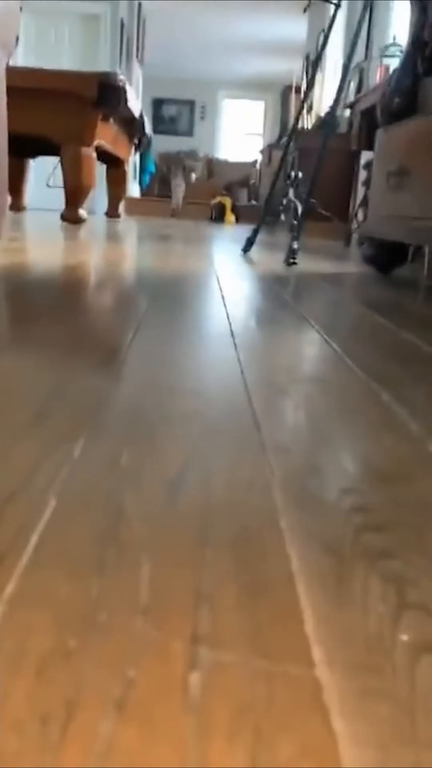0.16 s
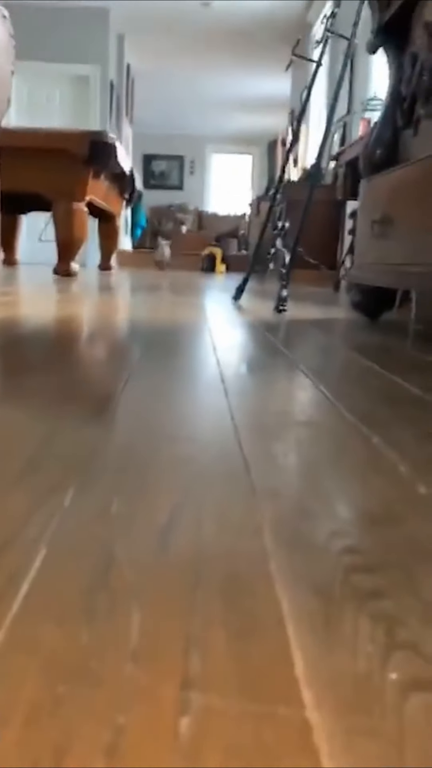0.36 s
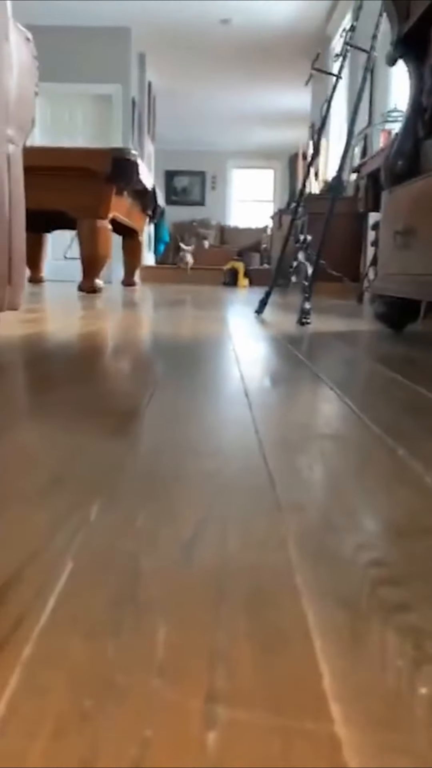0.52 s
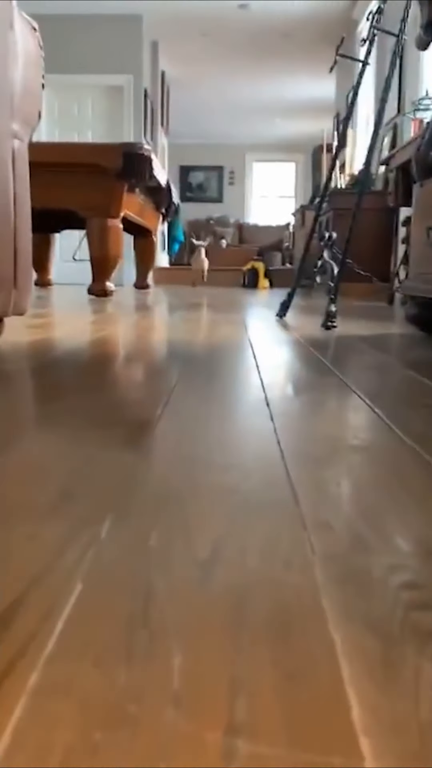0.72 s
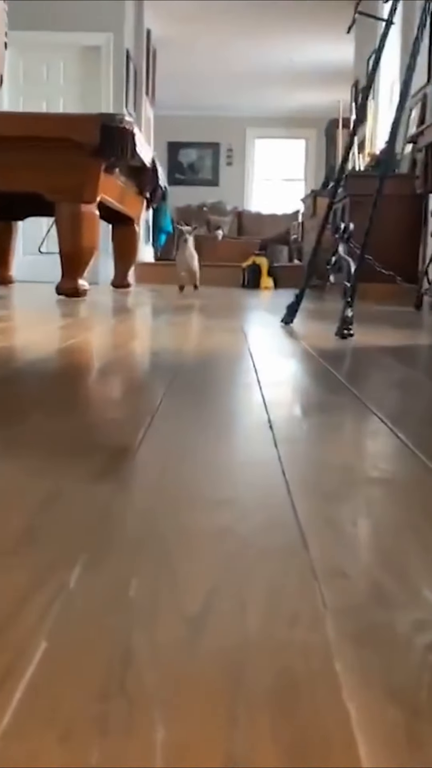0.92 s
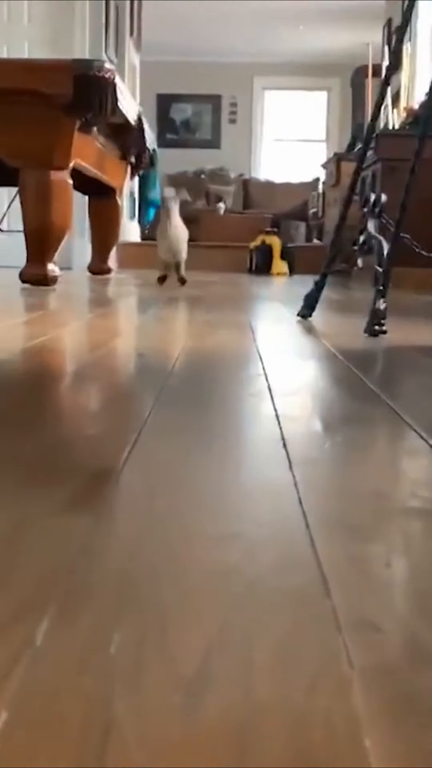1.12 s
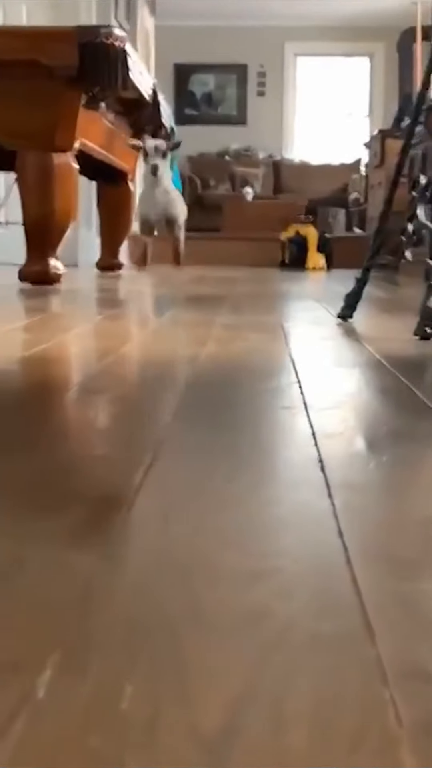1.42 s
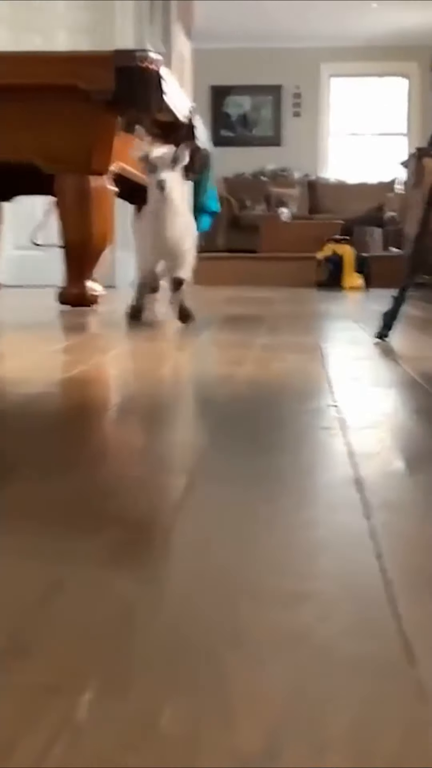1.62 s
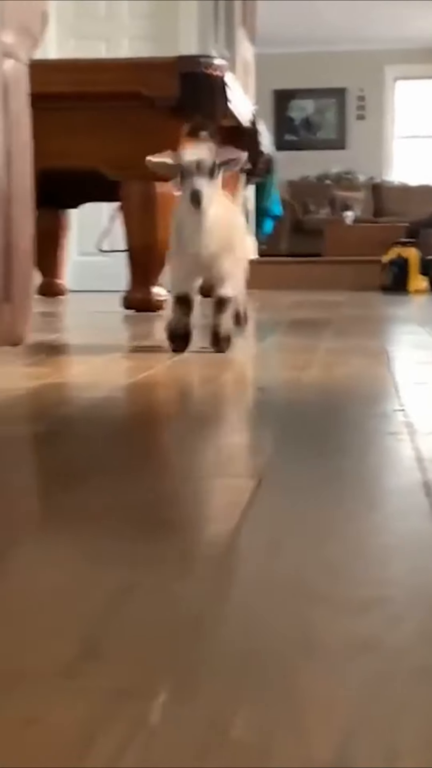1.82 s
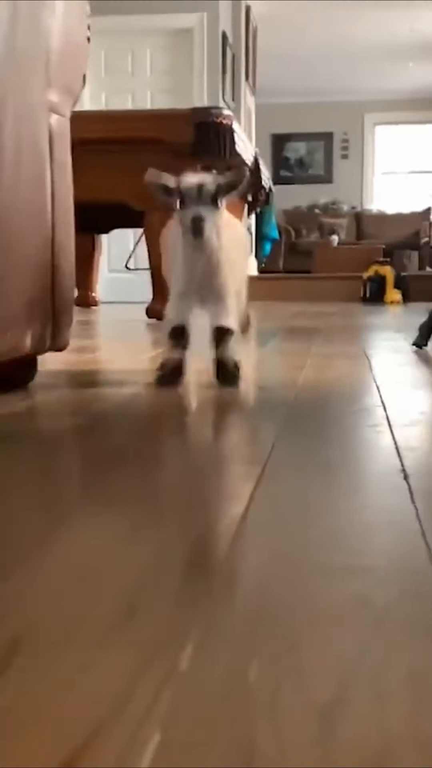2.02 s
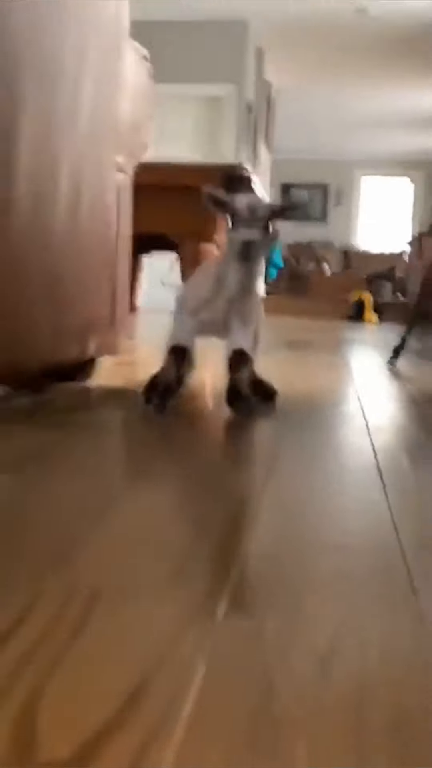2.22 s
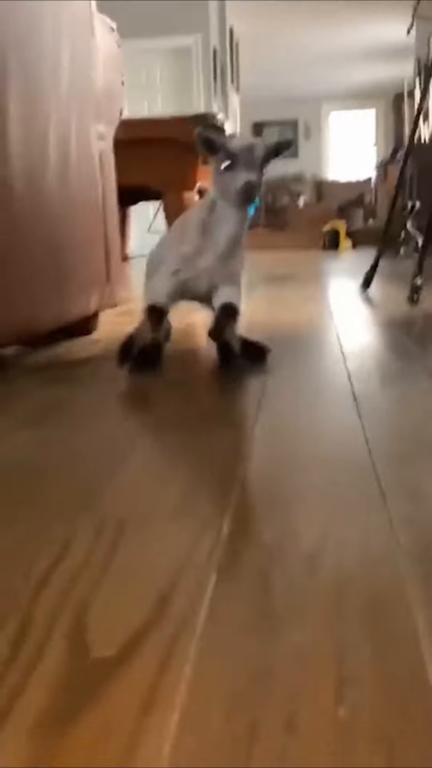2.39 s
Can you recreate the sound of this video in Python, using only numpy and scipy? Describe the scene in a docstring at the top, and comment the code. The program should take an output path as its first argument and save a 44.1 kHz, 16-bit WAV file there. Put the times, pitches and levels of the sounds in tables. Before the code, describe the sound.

A baby goat's hooves clatter over a hardwood floor, bounding closer and skidding to a stop.

```python
"""A big bare room with a hardwood floor, heard from one microphone held low, over a faint rumble.
First come distant hoof taps, and something snaps sharply right at the microphone. Then a kid goat bounds
towards it, each bound a cluster of hoof strikes: a clack, ringing boards, a boom of the joists, an echo.
On the way hooves scrape, the hardest landings crack, and flat ones trap air and clop.
At last the goat skids to a stop close by, as a faint hiss swells."""
import sys
import numpy as np
from scipy import signal
from scipy.fft import irfft
from scipy.io import wavfile

SR = 44100
rng = np.random.default_rng(int(sys.argv[2]) if len(sys.argv) > 2 else 0)


def transcribe(u):
    """Save the signal u as a 16-bit wav file named by the first command-line argument.

    u: samples, shape (n,) or (channels, n), limited to [-1, 1]; the rate is SR.
    q: integer samples, one column per channel.
    """
    v = np.clip(np.atleast_2d(u).T, -1, 1)
    q = np.round(v * 32767).astype(np.int16)
    wavfile.write(sys.argv[1], SR, q)


N = 112454


def amp(db):
    """Decibels to gain."""
    return 10 ** (np.asarray(db) / 20)


def unit_rms(x):
    """Scales to rms 1."""
    return x / np.sqrt(np.mean(x ** 2) + 1e-20)


def spectrum_db(points, hz):
    """Reads a spectrum on a log-frequency axis."""
    point_hz, point_db = np.transpose(points)
    return np.interp(np.log(hz + 1), np.log(point_hz + 1), point_db)


def add(mix, start_s, sound):
    """Mixes a sound in, dropping whatever falls outside the mix."""
    at = round(start_s * SR)
    part, sound = mix[max(at, 0):], sound[max(-at, 0):]
    part[:len(sound)] += sound[:len(part)]


def noise(shape, size):
    """Noise of rms 1 with the given relative gain per frequency bin."""
    return unit_rms(irfft(shape * np.exp(2j * np.pi * rng.random(len(shape))), size))


def coloured(points, size):
    """Noise of rms 1 that follows a spectrum."""
    return noise(amp(spectrum_db(points, np.fft.rfftfreq(size, 1 / SR))), size)


def decay(t, t60):
    """Falls by 60 dB in t60 seconds."""
    return np.exp(-np.log(1000) * t / t60)


# The room's steady rumble. Each row: frequency in Hz, relative level in dB.
RUMBLE_COLOUR = [(20, 15), (35, 10), (66, 6), (120, -10), (300, -12), (700, -12.5), (1500, -17.5),
                 (3000, -21.5), (6500, -27), (10000, -53), (13000, -52)]
# The hiss above it. Each row: frequency in Hz, relative level in dB.
HISS_COLOUR = [(500, 12.5), (3000, -2), (6500, 1), (8000, -0.5), (10000, -8.5), (13000, -10)]
# The course of that hiss. Each row: time in seconds, level in dB.
HISS_LEVELS = [(0, -57.5), (1.901, -76.5), (2.2, -43), (2.36, -50), (2.55, -53.5)]

def room_tone(rumble_db=-44):
    """All around the microphone: low rumble, and a faint hiss that fades, then swells as the goat stops."""
    hiss_db = np.interp(np.arange(N) / SR, *np.transpose(HISS_LEVELS))
    return amp(rumble_db) * coloured(RUMBLE_COLOUR, N) + amp(hiss_db) * coloured(HISS_COLOUR, N)


# Hoof on hardwood. Each row: frequency in Hz, relative level in dB.
WOOD_COLOUR = [(40, -2), (66, -1.5), (120, -5.5), (300, 5.5), (600, -5), (900, -5.5), (1250, -7.5),
               (1600, -5.5), (2100, -5), (2750, -5.5), (3300, -11.5), (4300, -11.5), (5300, -12),
               (6400, -11.5), (8000, -17.5), (10000, -27), (13000, -21.5)]
# Resonances of the floorboards. Each row: frequency in Hz, width in Hz, lift in dB.
BOARD_RESONANCES = [(74.5, 62, 6.5), (203.3, 5.8, 6.5), (360, 10.6, -1), (455.6, 5.6, 6.5), (538, 25, 4),
                    (929, 44, 2.5), (1190, 37, 5.5)]
# A strike's boom, thud, knock, clack and tick. Each row: low and high edge in Hz, direct attack and t60
# in seconds, direct gain in dB, room build-up and t60 in seconds.
REGISTERS = [(48, 130, 0.026, 0.19, -1, 0.014, 0.49), (153, 755, 0.0031, 0.13, -3, 0.014, 0.58),
             (565, 1290, 0.0018, 0.048, 1.5, 0.014, 0.61), (1280, 4210, 0.0042, 0.077, 0, 0.0078, 0.66),
             (4100, 9800, 0.00057, 0.028, 3, 0.0077, 0.55)]
# Hoof strikes on the way to the microphone. Each row: start in seconds, boom, thud, knock, clack and
# tick in dB, direct sound over the room in dB, the board's note in Hz, its level in dB.
STRIKES = np.array([ (-.04, -47, -43, -37, -38.5, -54, 24.5, 415, -39),
           (.030, -36, -53, -52.5, -63, -62, 12.5, 152.5, -36),
           (.319, -28.5, -38, -29, -37.5, -50, 3, 856, -30), (.334, -41, -31, -38, -38, -54, 10, 786, -20),
           (.345, -32, -28.5, -28.5, -62, -43.5, -11, 223, -20.5),
           (.382, -31, -55, -55, -34.5, -48, -13, 223, -21.5),
           (.405, -30.5, -28, -34, -48, -45, -4, 336, -40),
           (.519, -26.5, -34.5, -35, -33, -47.5, 3, 533, -40),
           (.572, -26.5, -36.5, -36.5, -42, -50, 4.5, 280, -43),
           (.765, -39, -36.5, -31, -36, -52, 3, 950, -23),
           (.803, -25.5, -32.5, -33, -34, -51.5, -8, 917, -21.5),
           (.968, -27, -46, -31.5, -45, -44, -12, 1182, -21),
           (.974, -24.5, -32.5, -35, -31, -47.5, 1.5, 456, -20.5),
           (1.014, -28.5, -31, -47, -32, -54, 4, 293, -40),
           (1.200, -38, -27, -27.5, -38, -39.5, 8, 454, -14),
           (1.208, -31, -28.5, -32.5, -34, -57, 10.5, 1185, -18.5),
           (1.237, -23.5, -25.5, -31, -37, -49, 10, 470, -35),
           (1.256, -50, -45, -28.5, -33.5, -46.5, 4.5, 1315, -22.5),
           (1.433, -26.5, -26.5, -29.5, -34, -42.5, 7.5, 224, -22),
           (1.445, -21, -30.5, -39, -35, -50.5, 9, 437, -30.5),
           (1.475, -24.5, -25.5, -29, -38.5, -50, 7.5, 194, -18.5),
           (1.508, -39, -27.5, -30, -39, -68, -2, 313, -28),
           (1.666, -42, -34, -24.5, -53, -50, 4, 190.5, -19),
           (1.675, -23, -32, -64, -33, -37, 4, 457, -19.5),
           (1.710, -39, -24.5, -32, -37.5, -46, 9, 289, -19.5),
           (1.735, -50, -32, -27.5, -36.5, -56, 6, 392, -15),
           (1.775, -50, -35.5, -33, -57, -69, 10, 931, -29),
           (1.904, -55.5, -25.5, -29, -33, -43, 7.5, 950, -21),
           (1.913, -31, -22, -29.5, -45, -50, 8.5, 545.6, -12),
           (1.920, -52, -31, -42, -54, -56, 8.5, 391.3, -11.5),
           (1.956, -34.5, -33, -35, -36.5, -51, 6.5, 271, -23),
           (2.118, -30.5, -34, -35, -37.5, -58, 15, 828, -20),
           (2.135, -35.5, -26.5, -34, -44.5, -60, 14, 660, -20),
           (2.179, -64, -36.5, -54, -38.5, -57, 15, 537, -21.5),
           (2.202, -36, -42, -39, -56, -72, 10.5, 338, -28), (2.243, -44, -43, -62, -52, -66, 6, 379, -40),
           (2.468, -50, -42, -49, -61, -61, 8, 630, -36)])

def hooves():
    """Each strike rings the floor in five registers; direct sound comes quickly, the room more slowly."""
    out, t = np.zeros(N), np.arange(SR) / SR
    hz = np.fft.rfftfreq(SR, 1 / SR) + 1
    lift_db = sum(db / (1 + (2 * (hz - centre) / width) ** 2) for centre, width, db in BOARD_RESONANCES)
    wood = amp(spectrum_db(WOOD_COLOUR, hz) + lift_db)
    bands = [wood / np.sqrt((1 + (low / hz) ** 8) * (1 + (hz / high) ** 10))
             for low, high, *_ in REGISTERS]
    for start, *levels_db, near_db, _, _ in STRIKES:
        for band, level_db, register in zip(bands, levels_db, REGISTERS):
            attack_s, direct_t60, direct_db, build_s, room_t60 = register[2:]
            direct = noise(band, SR) * (1 - np.exp(-(t / attack_s) ** 2)) * decay(t, direct_t60)
            room = noise(band, SR) * (1 - np.exp(-t / build_s)) * decay(t, room_t60)
            add(out, start, amp(level_db) * (amp(near_db + direct_db) * direct + room))
    return out


def board_notes(rise_cycles=0.91, t60_cycles=41.2, echo_db=-16.5, echo_t60=0.73):
    """Under each of those strikes a board sounds its own hollow note, which lingers in the room."""
    out, t = np.zeros(N), np.arange(SR) / SR
    hz = np.fft.rfftfreq(SR, 1 / SR)
    for start, *_, note_hz, note_db in STRIKES:
        ring = np.sin(2 * np.pi * note_hz * t) * decay(t, t60_cycles / note_hz)
        echo_band = 1 / (1 + (2 * (hz / note_hz - 1) / 0.046) ** 2)  # width: 4.6 % of the pitch
        echo = noise(echo_band, SR) * decay(t, echo_t60)
        rise = 1 - np.exp(-t * note_hz / rise_cycles)
        add(out, start, amp(note_db) * rise * (ring + amp(echo_db) * echo))
    return out


# What the snap rings with, heard close up. Each row: frequency in Hz, level in dB, t60 in seconds.
SNAP_MODES = [(48, -15.5, 0.14), (1350, -14, 0.0007), (1960, 0, 0.0039), (2380, -0.5, 0.0046),
              (3900, -13, 0.0088), (6280, -7, 0.0051), (2320, -35, 0.11)]
# Its thin rattle. Each row: frequency in Hz, relative level in dB.
RATTLE_COLOUR = [(200, 7), (1300, -36), (2400, 4), (3200, -8), (4000, 1), (5100, -14), (6600, 8),
                 (8300, -5), (10000, -22), (13000, -21)]
# Its echo from the room. Each row: frequency in Hz, relative level in dB.
SNAP_ECHO_COLOUR = [(200, -25), (600, -37), (1300, 4), (1800, 0), (2500, -8), (3800, 3), (5000, -1.5),
                    (6500, 1.5), (8300, -2), (10000, -10.5), (13000, -13)]

def snap(start_s=0.1061, tick_s=0.07, rise_cycles=0.95, chirp_hz=1550, chirp_fall_s=0.0016):
    """A hard click at the microphone: quick modes, a low bump, a falling chirp, a rattle, a faint echo."""
    out, t = np.zeros(N), np.arange(SR) / SR
    ring = sum(amp(db) * np.sin(2 * np.pi * hz * t) * (1 - np.exp(-t * hz / rise_cycles)) * decay(t, t60)
               for hz, db, t60 in SNAP_MODES)
    cycles = np.cumsum(chirp_hz / (1 + (t / chirp_fall_s) ** 2)) / SR  # the low tones arrive late
    chirp = amp(-18.5) * np.sin(2 * np.pi * cycles) * np.minimum(cycles, 1) * decay(t, t60=0.044)
    rattle = amp(-27.5) * coloured(RATTLE_COLOUR, SR) * decay(t, t60=0.15)
    echo = amp(-36) * coloured(SNAP_ECHO_COLOUR, SR) * decay(t, t60=0.46)
    add(out, tick_s, amp(-30) * (ring + rattle))  # the same thing ticks faintly before it snaps
    add(out, start_s, ring + chirp + rattle + echo)
    return out


# Horn scraping on varnish. Each row: frequency in Hz, relative level in dB.
SKID_COLOUR = [(300, -18), (1500, 3), (2700, 5.5), (3500, 3), (4400, -1), (5400, -5.5), (6500, 0.5),
               (8200, -10.5), (10000, -16.5), (13000, -21)]
# Hooves that slide as they land. Each row: start in seconds, length in seconds, level in dB.
SKIDS = [(0.526, 0.048, -43), (1.663, 0.023, -29), (1.899, 0.03, -31.5), (2.117, 0.022, -37)]

def skids(grit_db=4, grain_s=0.00058):
    """Horn scrapes over the varnished floor in short gritty bursts."""
    out, t = np.zeros(N), np.arange(SR) / SR
    for start, length, db in SKIDS:
        roughness = np.interp(t / grain_s, np.arange(SR), rng.standard_normal(SR))
        grit = unit_rms(amp(grit_db * roughness))
        stroke = np.sqrt(abs(np.sin(np.pi * np.minimum(t / length, 1))))
        add(out, start, amp(db) * stroke * grit * coloured(SKID_COLOUR, SR))
    return out


# Modes of hoof horn on wood. Each row: multiple of the pitch, level in dB, t60 in seconds.
HORN_MODES = [(0.57, -27, 0.011), (0.8, -25, 0.031), (1, 3, 0.016), (1.265, -4, 0.026),
              (2.04, -21.5, 0.048)]
# The hardest landings. Each row: start in seconds, level in dB, pitch of the horn in Hz.
CRACKS = [(0.9753, -17, 2113), (1.2068, -11, 2186), (1.255, -19, 2110), (1.675, -24.5, 4350),
          (1.9122, -23, 2830), (2.1189, -21, 2190), (2.186, -20.5, 1875)]

def cracks(rise_s=0.00067):
    """A hard landing makes the horn itself ring for a moment, higher when only its edge strikes."""
    out, t = np.zeros(N), np.arange(SR // 4) / SR
    for start, level_db, hz in CRACKS:
        phases = 2 * np.pi * rng.random(len(HORN_MODES))
        ring = sum(amp(db) * np.sin(2 * np.pi * hz * ratio * t + phase) * decay(t, t60)
                   for (ratio, db, t60), phase in zip(HORN_MODES, phases))
        add(out, start, amp(level_db) * ring * (1 - np.exp(-t / rise_s)))
    return out


# Flat landings, nearer the microphone. Each row: start in seconds, pitch in Hz, level in dB.
CLOPS = [(1.4345, 760, -13), (2.119, 833, -9.5)]

def clops(rise_s=0.0027, t60=0.024):
    """Air trapped under a flat hoof gives a hollow tone that swells and dies at once."""
    out, t = np.zeros(N), np.arange(SR) / SR
    swell = (1 - np.exp(-(t / rise_s) ** 2)) * decay(t, t60)
    for start, hz, db in CLOPS:
        add(out, start, amp(db) * swell * np.sin(2 * np.pi * hz * t))
    return out


def scene():
    """Everything that reaches the one microphone just above the floor."""
    return (room_tone() + hooves() + board_notes() + snap() + skids() + cracks() + clops())[None]


def record(dry):
    """The recorder cuts off the highest treble."""
    edge_hz = 13250
    lowpass = signal.firwin(301, edge_hz, window=("kaiser", 8), fs=SR)
    return signal.oaconvolve(dry, lowpass[None], "same")


dry = scene()
out = record(dry)
transcribe(out)
```